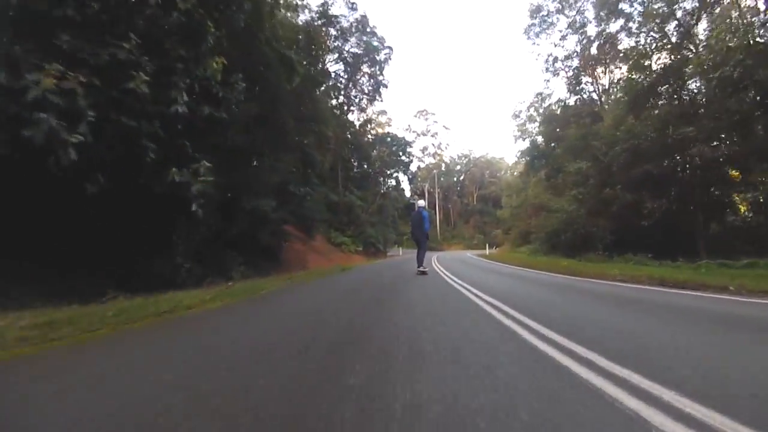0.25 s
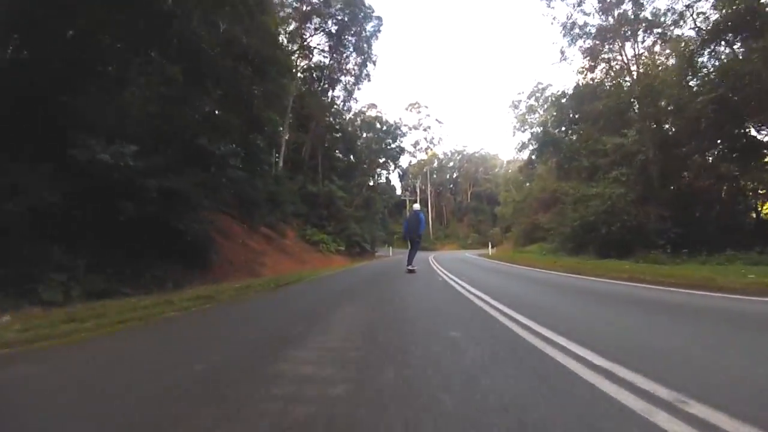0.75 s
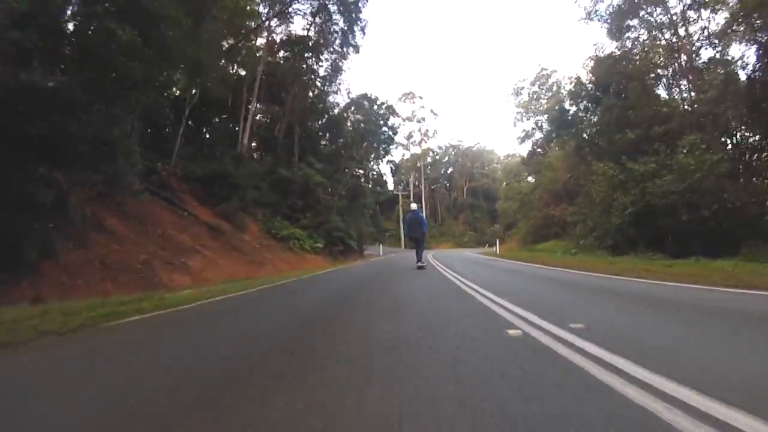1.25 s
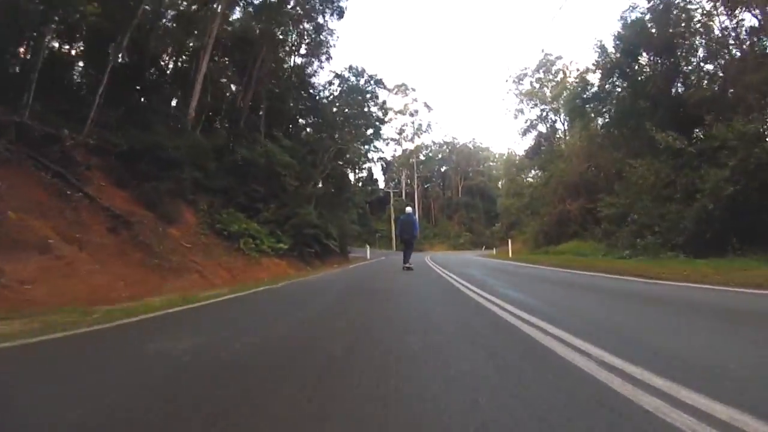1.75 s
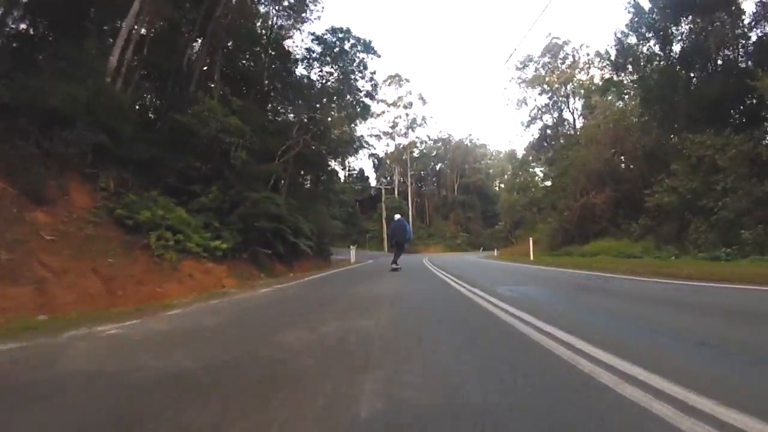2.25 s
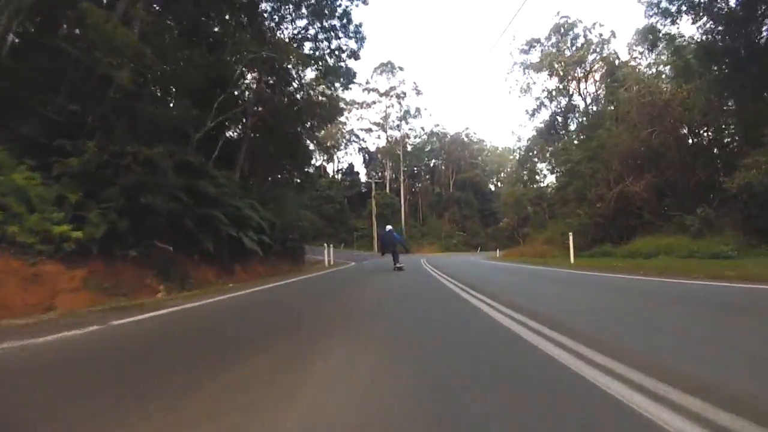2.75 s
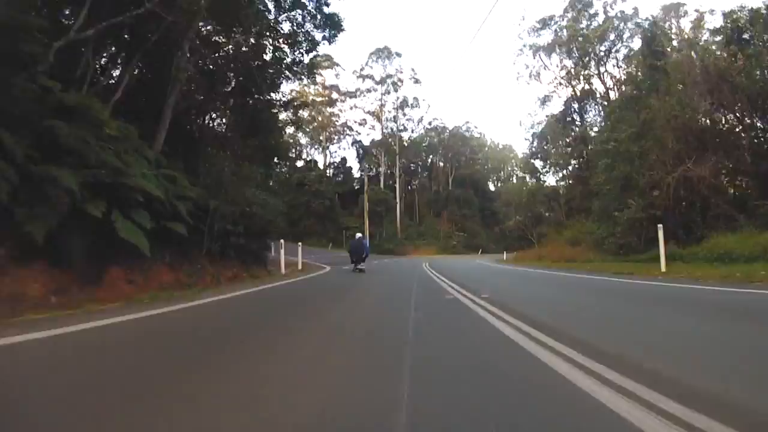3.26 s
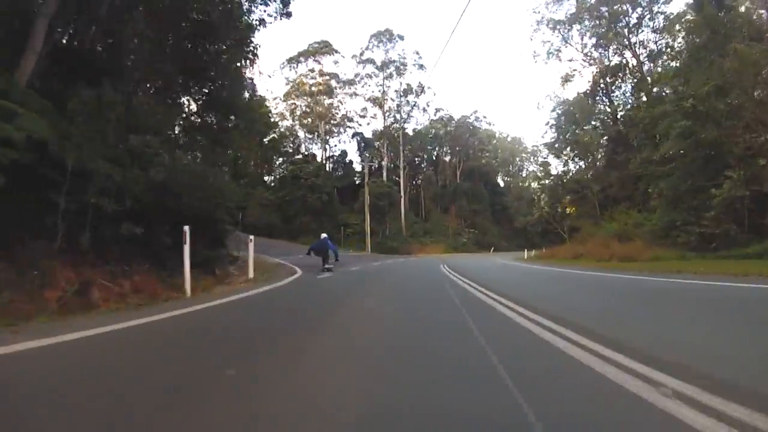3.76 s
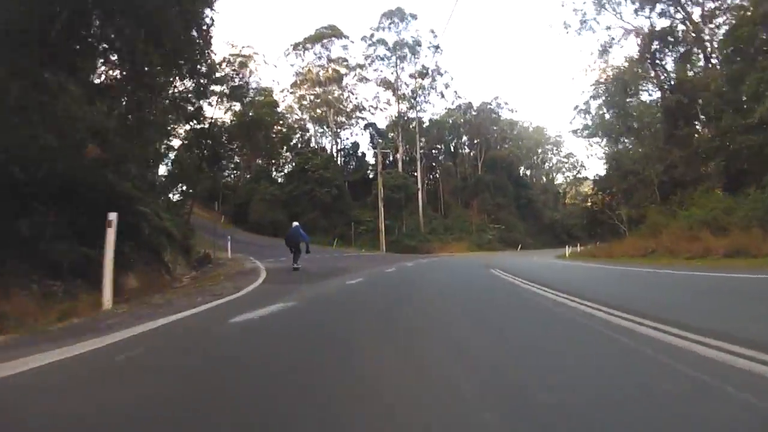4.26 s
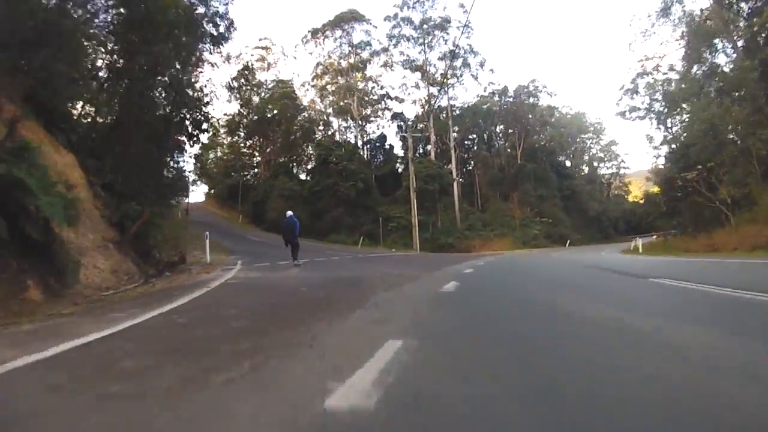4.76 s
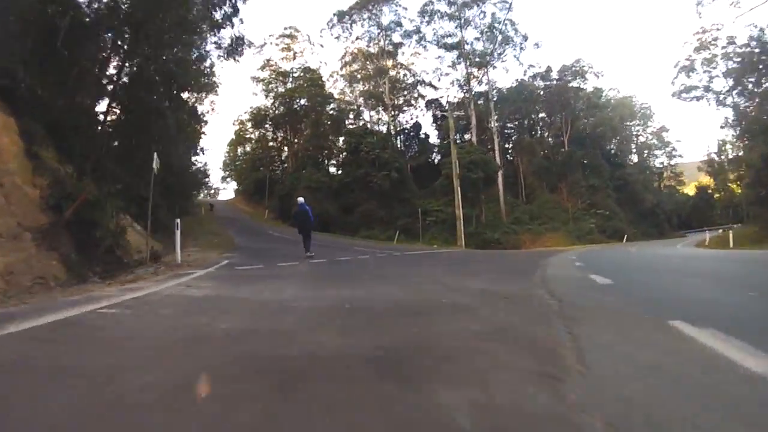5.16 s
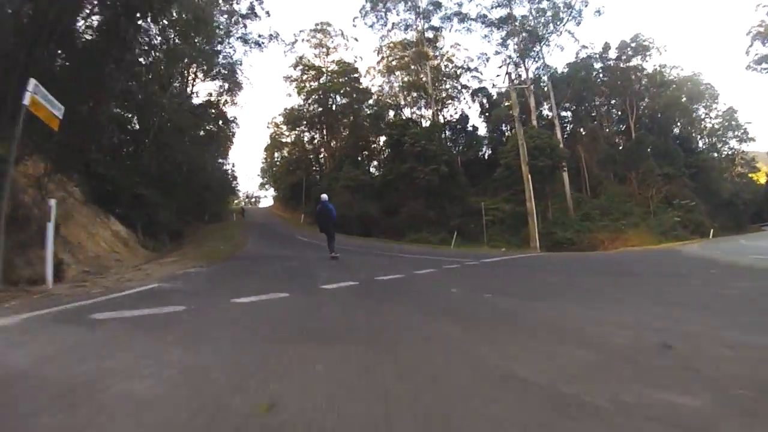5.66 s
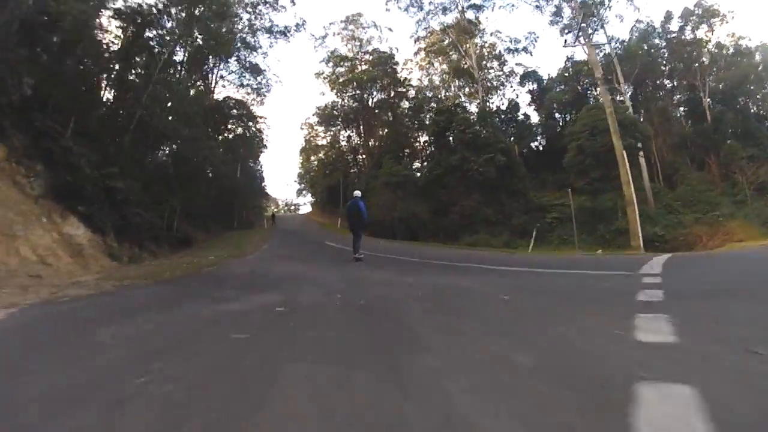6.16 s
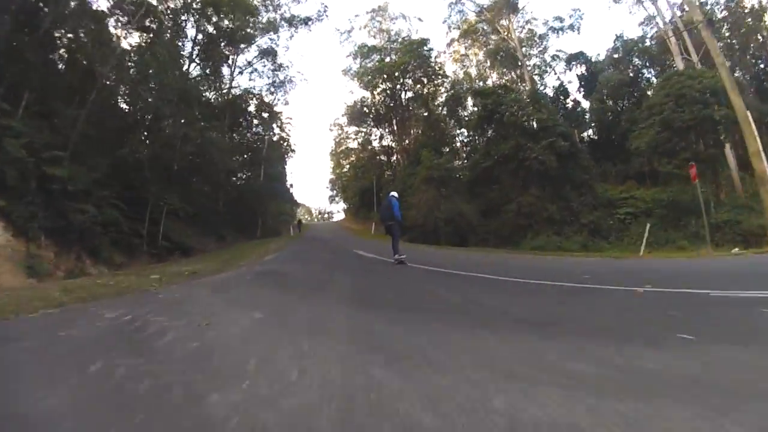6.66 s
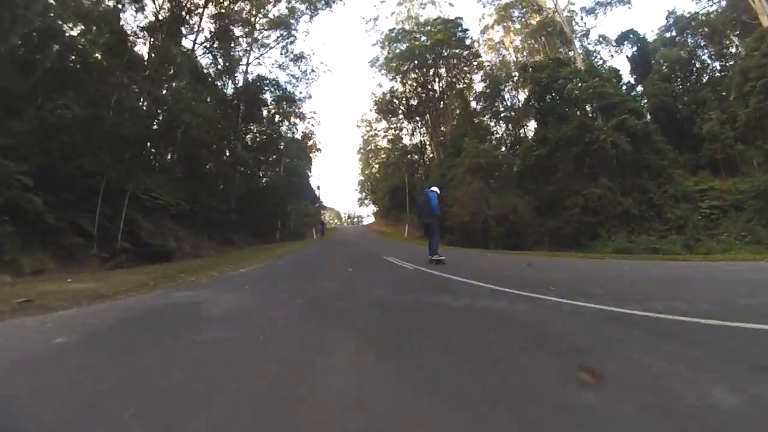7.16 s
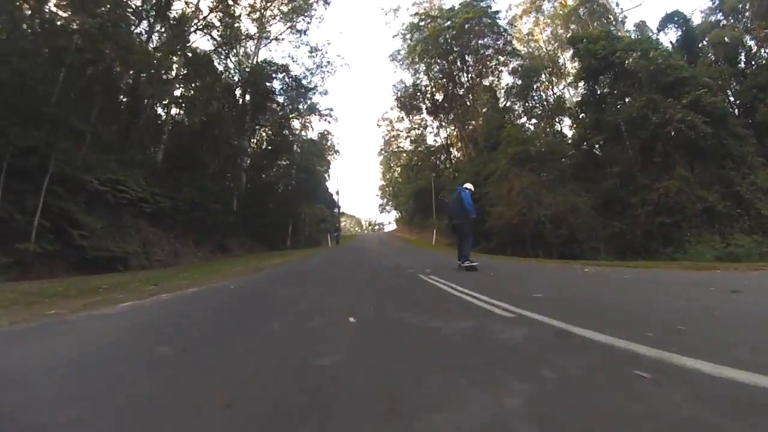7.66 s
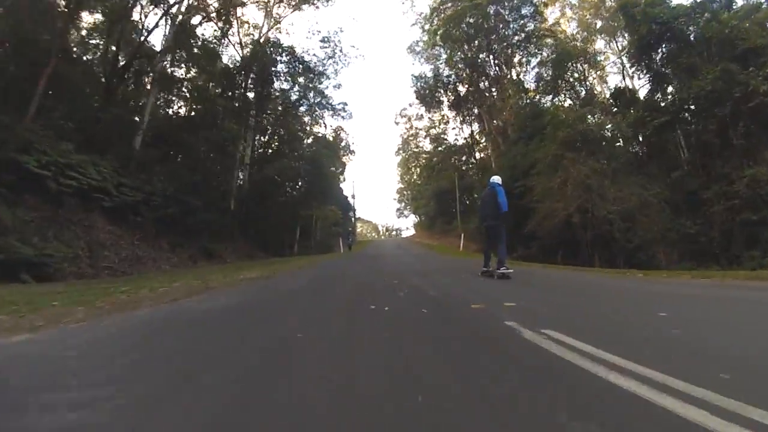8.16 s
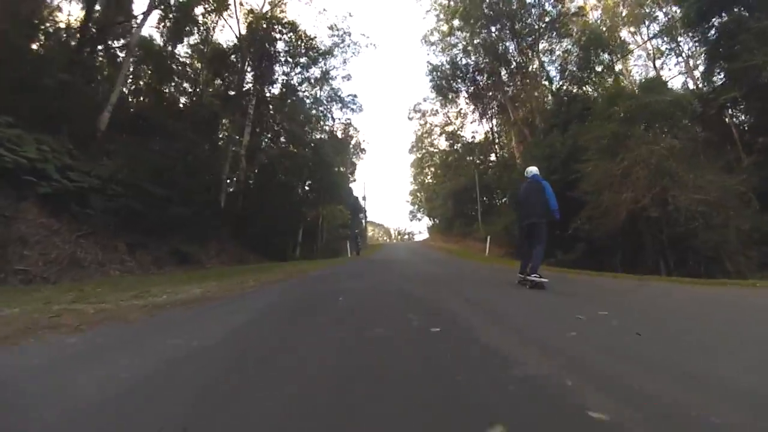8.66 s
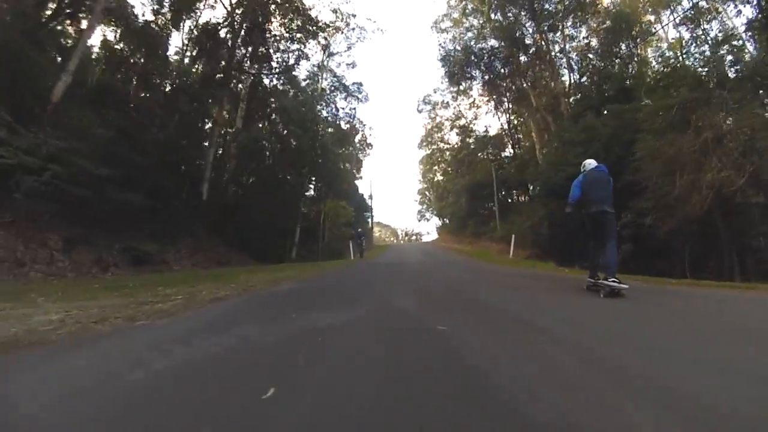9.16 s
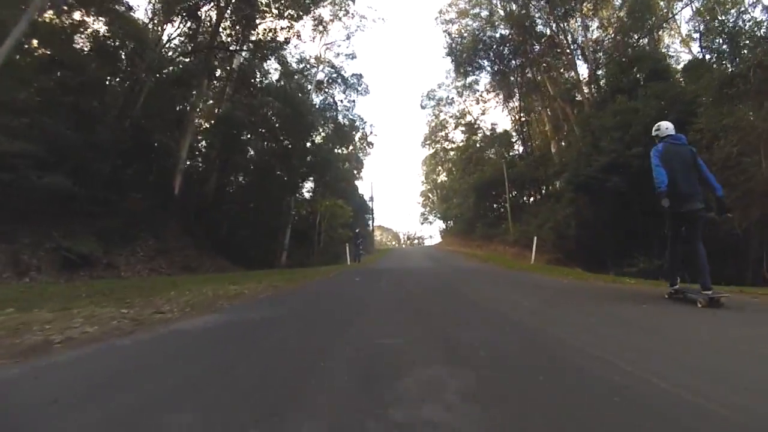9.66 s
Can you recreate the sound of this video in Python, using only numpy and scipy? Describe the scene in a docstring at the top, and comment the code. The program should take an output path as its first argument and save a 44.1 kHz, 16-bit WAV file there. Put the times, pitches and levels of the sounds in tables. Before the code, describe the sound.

From the start a fast ride on asphalt shakes the camera mount: a dominant, uneven bass rumble around 40 to 130 hertz, muffled wheel roar, fine gritty grinding and faint steady hiss. Small stones tick and crunch. Around 1.95-2.05 s a hard bump thuds with clustered stone knocks and bright case clacks; gravel and swelling rumble continue to 3.3 s, then it eases. A jolt at 3.9 s leads to the hardest hit at 4.15-4.3 s, with clacks and a ringing bracket rattle. From 4.7 to 6.3 s a thin wheel drone joins coarser grinding, with bumps near 5.1, 5.3 and 5.75 s and a rough patch at 6.5 s. After 7 s it slows and quietens; a low engine-like throb glides up and down, with tiny metallic chirps at 8.2-8.7 s. From 9.2 s a longboard's wheels rasp and sizzle close, still present at the end.

```python
"""A vehicle rolls fast down an asphalt road, its shaking carried into a low camera's mount and case.
Noise driven through resonant bodies makes the mount rock, the bodywork drum, the wheels roar and the grit grind.
Rough patches, two of them severe, swell it; soft pushes jolt the vehicle, and short noise bursts crunch and clack.
On the rise an engine-like throb of gliding partials dips and climbs as the camera draws up to a longboard rider,
whose wheels rasp and sizzle nearer in shaped noise; small metal parts ring as dying sines over a faint hiss."""
import sys
import numpy as np
from scipy import signal
from scipy.fft import rfft, irfft
from scipy.io import wavfile
from scipy.ndimage import uniform_filter1d

SR = 44100
rng = np.random.default_rng(int(sys.argv[2]) if len(sys.argv) > 2 else 0)


def unload_audio(sound):
    """Save the sound as a 16-bit wav file, at the path given as the first command line argument."""
    columns = np.transpose(np.atleast_2d(sound))
    # keep every value between -1 and 1, then stretch to whole-number steps
    steps = np.round(np.clip(columns, -1, 1) * 32767)
    wavfile.write(sys.argv[1], SR, steps.astype(np.int16))


N = 437017
TIME = np.arange(N) / SR
CUTOFF_HZ = 13500

# Speed falls in the curve and on the rise, then picks up again at the end: t/s, speed/share of top speed
SPEED_CURVE = [(0, 0.98), (2.9, 0.92), (4.9, 0.86), (6.5, 0.8), (7.25, 0.58), (8.9, 0.45), (9.9, 0.64)]
# Unevenness of the road under the wheels: t/s, relative level/dB
ROAD_UNEVENNESS = [(0, -0.5), (1.3, -0.4), (2.45, 1.5), (2.68, -0.5), (2.98, 2.5), (3.28, -1), (3.52, -5),
                   (4.05, -3.5), (4.6, -3.5), (4.95, -3.5), (5.35, 2.5), (5.92, -1), (7.15, -0.1), (7.5, 1),
                   (7.9, -2), (8.6, -0.5), (8.9, -3.5), (9.6, -2)]
# Rough patches under the wheels: t/s, length/s, relative shaking/dB, relative grinding/dB
ROUGH_PATCHES = [(0.293, .1, -17.5, -24), (1.634, 0.057, -5.5, -2), (1.948, 0.072, 0, 2.5),
                 (3.845, 0.03, -2.5, -1), (4.157, 0.074, 1, -1.5), (6.443, 0.29, -11.5, -10.5),
                 (6.8, 0.47, -15.5, -34), (9.233, 0.06, -13.5, -35)]
PATCH_ATTACK_S, SHAKE_FALL_DB_PER_S, GRIND_FALL_DB_PER_S = .02, 69, 71.5
# Long waves in the road that rock the mount: t/s, level/dB
ROAD_WAVES = [(1.24, -28), (1.55, -24), (2.0, -18.5), (2.55, -24.5), (2.8, -21.5), (2.95, -21),
              (3.268, -23), (3.92, -22.5), (4.191, -16), (5.43, -24.5), (5.759, -20.5), (6.55, -20.5)]
WAVE_S = 0.054  # from the crest of a wave to 1/e of it

# How the mount's sway answers the ride: level at top speed/dB, power of speed, power of the road's unevenness,
# level on a patch of 0 dB/dB
SWAY_RESPONSE = dict(cruise_db=-25, speed_power=2.21, road_share=0.73, patch_db=-24.5)
# The same settings for the drumming bodywork: level/dB, power, power, level/dB
BODYWORK_RESPONSE = dict(cruise_db=-33, speed_power=1.04, road_share=1.55, patch_db=-23)
# The same settings for the roaring wheels: level/dB, power, power, level/dB
ROAR_RESPONSE = dict(cruise_db=-55.5, speed_power=0.94, road_share=0.93, patch_db=-47.5)
# The same settings for air squeezed from under the wheels: level/dB, power, power, level/dB
AIR_RESPONSE = dict(cruise_db=-69.5, speed_power=2.9, road_share=0.98, patch_db=-68.5)
# The same settings for the grinding grit, before the side road: level/dB, power, power, level/dB
GRIND_RESPONSE = dict(cruise_db=-62, speed_power=1.47, road_share=0.28, patch_db=-57.5)
# The side road has coarser chips and grinds louder
SIDE_ROAD_S, SIDE_ROAD_BLEND_S, SIDE_ROAD_DB = 4, 1, 3

# Broad colour of the rocking mount: f/Hz, relative level per Hz/dB
SWAY_COLOUR = [(12, -48.5), (24, -27), (33, -4), (42, -7.5), (58, -7), (68, -20.5), (110, -39)]
# Slow sway resonance of the mount: f/Hz, width/Hz, height/dB
SWAY_RESONANCES = [(39.55, 5.3, 10)]
# Quicker nodding resonance of the mount: f/Hz, width/Hz, height/dB
NOD_RESONANCES = [(52.8, 7, 11.5)]
NOD_DB, NOD_POWER = -6.3, -0.9  # nod over sway at top speed, and its power of speed: more nod when slow
# Broad colour of the bodywork: f/Hz, relative level per Hz/dB
BODYWORK_COLOUR = [(45, -24.5), (72, 1), (98, -1.5), (112, -6), (128, -2.5), (162, -10), (176, -17),
                   (212, -16), (255, -28), (400, -45.5)]
# Bodywork resonances: f/Hz, width/Hz, height/dB
BODYWORK_RESONANCES = [(78.3, 9, 6), (98.6, 24, 2), (127.9, 4.2, 3.5), (171, 12, 4), (174, 6.1, -3),
                       (210, 84, 2.5)]
# Broad colour of the wheel roar: f/Hz, relative level per Hz/dB
ROAR_COLOUR = [(150, -11.5), (270, 0.5), (370, -1.5), (420, -8), (500, -8.5), (650, -16), (820, -17.5),
               (1050, -29.5), (1600, -36), (4000, -61.5)]
# Wheel resonance in the roar: f/Hz, width/Hz, height/dB
WHEEL_RESONANCES = [(450, 19, 2.1)]
# Colour of the squeezed air: f/Hz, relative level per Hz/dB
AIR_COLOUR = [(550, -14), (760, 0), (980, -2.5), (1250, -10.5)]
# Broad colour of grit heard through the case: f/Hz, relative level per Hz/dB
CASE_COLOUR = [(200, -21.5), (700, -11.5), (1020, -6.5), (1300, 0), (1700, 2), (2000, -1), (2520, -3),
               (2750, -13.5), (3200, -19.5), (3600, -12.5), (4300, -22), (5700, -27), (8000, -34),
               (13000, -40)]
# Case resonances: f/Hz, width/Hz, height/dB
CASE_RESONANCES = [(1236, 39, 4.5), (1462, 71, 7.1), (1532, 110, 5), (2120, 130, 2.3), (3970, 200, 2.4),
                   (4270, 160, 5.4), (4750, 110, 5.5), (5140, 170, 8.3)]

# Colour of the steady hiss: f/Hz, relative level per Hz/dB
FAINT_HISS_COLOUR = [(100, -3.5), (2500, 3.5), (4500, -1), (6000, -6), (7500, -6), (10500, -10.5),
                     (13000, -17.5)]
# Thin whine in the steady hiss: f/Hz, width/Hz, height/dB
WHINE_RESONANCES = [(7408, 14, 14)]
# The wheels drone, loudest in the curve and for a moment after the rise: t/s, level/dB
DRONE_CURVE = [(0, -79.5), (4.3, -74), (4.7, -62), (6.1, -60.5), (6.5, -68.5), (9.0, -81.5), (9.25, -59),
               (9.45, -83)]
DRONE_HZ, DRONE_POWER = 375.7, 0.33  # pitch at top speed, and its power of speed
# Small metal parts: f/Hz, relative peak level/dB, t60/s, power of speed
METAL_PARTS = [(2140, -55.5, .05, 4), (2480, -62, .03, 2), (4310, -69.5, .022, 1)]

# Stretches of gravel under the wheels: start t/s, end t/s, stones/s, strongest relative level/dB
GRAVEL_STRETCHES = [(0.1, 1.9, 20, -47.5), (2.281, 3.26, 34, -46.5), (4.225, 4.343, 80, -44.5),
                    (5.282, 5.497, 40, -46), (8.1, 8.66, 40, -53)]
GRAVEL_SPREAD_DB, GRAVEL_T60_S = 6, 0.025  # how much the stones differ; decay of each crunch
# A wheel strikes a stone or an edge: t/s, relative level/dB, t60 of the crunch/s
STONE_STRIKES = [(0.2855, -48, 0.023), (1.485, -45, 0.035), (1.9495, -36, 0.043), (1.9605, -37, .05),
                 (1.9935, -41.5, 0.092), (2.0275, -39.5, 0.058), (2.4384, -42.5, 0.024),
                 (2.6975, -46, 0.034), (4.1478, -41.5, .1), (4.1555, -43, 0.071), (4.1797, -33.5, 0.029),
                 (4.2168, -37.5, 0.048), (4.2551, -41.5, 0.048), (4.2665, -48.5, 0.041),
                 (4.3615, -44, 0.018), (5.2425, -40.5, 0.043), (5.7384, -45, .03), (6.4388, -42.5, 0.032),
                 (7.6785, -44, 0.014), (8.2444, -49, 0.03), (8.5805, -50.5, 0.04), (8.6598, -52, .03),
                 (9.0569, -42.5, .024), (9.098, -54.5, 0.044)]
# The vehicle's broad answer to a stone: f/Hz, relative level per Hz/dB
KNOCK_COLOUR = [(150, -1.5), (400, -4), (900, -5), (1300, 3), (2000, 0), (2500, 3.5), (2800, -8.5),
                (3150, -11.5), (3900, -11.5), (5500, -26), (9000, -33)]
# Resonances in that answer: f/Hz, width/Hz, height/dB
KNOCK_RESONANCES = [(1540, 82, 6), (2240, 50, 6), (2420, 180, 2)]
# The case clacks against its mount: t/s, relative level/dB
CASE_CLACKS = [(1.9784, -49), (1.987, -47.5), (1.9976, -54), (2.012, -47), (3.8636, -50), (4.147, -51),
               (4.163, -56), (4.1796, -40.5), (4.215, -53.5), (4.2345, -55.5), (5.1253, -55),
               (5.3288, -53.5), (6.5277, -53), (6.554, -57), (6.74, -55), (7.6784, -60), (9.0568, -60),
               (9.098, -57)]
CLACK_T60_S = 0.012
# Broad colour of a clack: f/Hz, relative level per Hz/dB
CLACK_COLOUR = [(400, -22.5), (1500, 4), (2500, 5.5), (3200, -8), (3900, 0), (4450, -13), (5200, -1),
                (6000, -5.5), (8000, -9.5), (10000, -13), (12500, -10.5), (14500, -40)]
# Resonances in a clack: f/Hz, width/Hz, height/dB
CLACK_RESONANCES = [(3850, 300, 2.7), (4890, 250, 11), (7500, 500, 5.4), (10800, 400, 6.6)]
# Bumps that jolt the whole vehicle; the strongest sets the overall peak: t/s, push level/dB
VEHICLE_JOLTS = [(1.975, -14), (1.993, -21.5), (3.893, -24), (4.15, -20), (4.176, -11.5), (4.22, -20.5),
                 (5.127, -24), (5.331, -27.5), (6.527, -32)]
# A bracket rattles around the hardest jolt: t/s, level before the mode's own/dB
BRACKET_RATTLES = [(4.1545, -53), (4.2236, -48), (4.2555, -50), (4.2665, -43.5), (4.297, -52), (4.325, -57)]
# What the bracket rings with: f/Hz, relative level/dB, t60/s
BRACKET_RINGS = [(2170, -11, .05), (2170, -8, 0.092)]

# The low throb on the rise: t/s, pitch f/Hz, relative level/dB, strain/0-1
THROB_CURVE = [(7.1, 42, -58, 0), (7.49, 46, -38.5, 0), (8.07, 50.27, -39.5, 0), (8.27, 49.95, -43.5, .6),
               (8.45, 40, -44, 0.05), (8.65, 48.85, -34, 0), (8.9, 56.18, -39.5, 0),
               (9.06, 50.8, -43, 0.56), (9.3, 54.94, -40, 0.96), (9.36, 39.2, -31, 0),
               (9.45, 44.17, -31.5, 0.22), (9.66, 53, -35, 0.4), (9.81, 59.9, -31.5, 0),
               (9.9, 63.36, -26.5, 0)]
# Partials of the throb: multiple of the pitch
THROB_MULTIPLES = [1, 1.5, 2, 3, 4, 6]
# Levels of those partials: level running easy/dB, level under strain/dB
THROB_PARTIALS = [(1, 3), (-20, 1.5), (-13.5, 2), (-27, -1.5), (-32, -8), (-44, -20.5)]
# A small metal part chirps on the rise: t/s, f/Hz
METAL_CHIRPS = [(8.162, 4245), (8.314, 4350), (8.355, 4270), (8.436, 4720), (8.456, 4730), (8.478, 4783),
                (8.556, 4310), (8.578, 4220), (8.659, 4330)]
CHIRP_DB, CHIRP_T60_S = -68.5, 0.032  # middle level and decay
CHIRP_LOW_HZ, CHIRP_LOW_DB = 3550, -5  # a lower mode, on average weaker, rings with it
# The longboard coming near: t/s, relative rasp level/dB
LONGBOARD_APPROACH = [(0, -100), (8.6, -84), (9.15, -71), (9.33, -64), (9.44, -58.5), (9.54, -54.3),
                      (9.67, -57.3), (9.78, -55.6), (9.9, -55.6)]
# Colour of the longboard's rasp: f/Hz, relative level per Hz/dB
RASP_COLOUR = [(350, 0), (500, -1), (950, -13), (1250, -6), (1480, 0), (2000, -1), (2550, -4), (3100, -22)]
# Resonances in the rasp: f/Hz, width/Hz, height/dB
RASP_RESONANCES = [(480, 38, 12), (1520, 120, 0.5), (2060, 53, 9), (2200, 150, 7), (2520, 80, 5)]
SIZZLE_FROM_S, SIZZLE_SWELL_S, SIZZLE_DB = 8.95, .85, -71.6  # an even swell up to this level
# Colour of the longboard's fine sizzle: f/Hz, relative level per Hz/dB
SIZZLE_COLOUR = [(3150, -10), (3500, 0), (4300, -1), (5800, -9.5), (7450, -8), (8200, -16), (13000, -24)]
# Resonance in the sizzle: f/Hz, width/Hz, height/dB
SIZZLE_RESONANCES = [(5130, 200, 3)]


def from_db(db):
    """Decibels to gain."""
    return 10 ** (np.asarray(db) / 20)


def rms_one(x):
    """Scale to unit power."""
    return x / np.sqrt(np.mean(x ** 2) + 1e-20)


def level_curve(rows):
    """Turn rows of time and dB into a gain per sample."""
    s, db = np.transpose(rows)
    return from_db(np.interp(TIME, s, db))


def drift(rate):
    """Slow chance of spread 1, changing about rate times a second."""
    knots = rng.standard_normal(int(TIME[-1] * rate) + 2)
    return rms_one(np.interp(TIME * rate, np.arange(len(knots)), knots))


def body(force, colour, modes, size=32768):
    """Ring a force through a causal response of unit energy: a broad colour with resonances on it."""
    hz = np.arange(size // 2 + 1) * SR / size
    points = np.array(colour)
    db = np.interp(np.log(hz + 1), np.log(points[:, 0]), points[:, 1])
    # fall away beyond both ends of the colour
    above = np.maximum(hz / points[-1, 0], 1)
    below = np.maximum(points[0, 0] / (hz + 1), 1)
    db -= 40 * np.log10(above * below)
    for centre, width, height in modes:
        db += height / (1 + (2 * (hz - centre) / width) ** 2)
    # minimum phase: nothing sounds early
    cepstrum = irfft(np.log(from_db(db)))[:size // 2]
    response = irfft(np.exp(rfft(2 * cepstrum, size)))[:size // 2]
    return signal.fftconvolve(force, response / np.linalg.norm(response))[:N]


def steadied(x, seconds):
    """Even out the swells of a vibration that last longer than the given time."""
    window = int(seconds * SR)
    power = uniform_filter1d(uniform_filter1d(x ** 2, window), window)
    return x / np.sqrt(np.abs(power) + 1e-12)


def wandering(x, share, per_s):
    """Let the pitch of a vibration stray a little as the load shifts."""
    position = np.cumsum(1 + share * drift(per_s))
    return np.interp(position * (N - 1) / position[-1], np.arange(N), x)


def contacts(events, crunch, rise_s):
    """Each contact is a sharp click and a short noise crunch that builds up quickly and dies."""
    force, age = np.zeros(N), TIME[:SR // 10]
    for s, db, t60 in events:
        swell = np.minimum(age / rise_s, 1) * from_db(-60 * np.maximum(age - rise_s, 0) / t60)
        blow = crunch * rng.standard_normal(len(age)) * swell
        blow[0] += 1
        at = int(s * SR)
        force[at:at + len(age)] += from_db(db) * blow[:N - at]
    return force


def speed():
    """Share of top speed at every sample."""
    return np.maximum(np.interp(TIME, *np.transpose(SPEED_CURVE)), .1)


def patches():
    """Rough patches set in quickly, hold and die away: gains of shaking and of grinding."""
    shake, grind = np.zeros(N), np.zeros(N)
    for s, length, shake_db, grind_db in ROUGH_PATCHES:
        entered = np.clip(1 + (TIME - s) / PATCH_ATTACK_S, 0, 1)
        since = np.maximum(TIME - s - length, 0)
        shake += entered * from_db(shake_db - SHAKE_FALL_DB_PER_S * since)
        grind += entered * from_db(grind_db - GRIND_FALL_DB_PER_S * since)
    return shake, grind


def driven(patch, cruise_db, speed_power, road_share, patch_db):
    """A part's gain grows with speed and unevenness; rough patches add their power on top."""
    ride = from_db(cruise_db) * speed() ** speed_power * level_curve(ROAD_UNEVENNESS) ** road_share
    return np.hypot(ride, from_db(patch_db) * patch)


def sway_level(shake, wander_db):
    """How far the mount rocks: with the ride, wandering a little, and swelling on each wave in the road."""
    waves = sum(from_db(db) * np.exp(-((TIME - s) / WAVE_S) ** 2) for s, db in ROAD_WAVES)
    return np.hypot(driven(shake, **SWAY_RESPONSE) * from_db(wander_db * drift(5.5)), waves)


def rumble(shake):
    """The uneven road rocks the mount, drums on the bodywork, roars in the wheels and squeezes out air."""
    road = rng.standard_normal((5, N))
    lumps = from_db(1.7 * drift(70))  # the same lumps of asphalt push on mount and bodywork
    sway = body(road[0] * lumps, SWAY_COLOUR, SWAY_RESONANCES)
    nod = from_db(NOD_DB) * speed() ** NOD_POWER * body(road[1] * lumps, SWAY_COLOUR, NOD_RESONANCES)
    rocking = sway_level(shake, wander_db=0.95) * steadied(sway + nod, seconds=0.085)
    bodywork = wandering(body(road[2] * lumps, BODYWORK_COLOUR, BODYWORK_RESONANCES), share=.025, per_s=4)
    drumming = driven(shake, **BODYWORK_RESPONSE) * steadied(bodywork, seconds=0.064)
    roar_force = road[3] * from_db(1.5 * drift(60))
    roaring = driven(shake, **ROAR_RESPONSE) * body(roar_force, ROAR_COLOUR, WHEEL_RESONANCES)
    squeezed_air = driven(shake, **AIR_RESPONSE) * body(road[4], AIR_COLOUR, [])
    return rocking + drumming + roaring + squeezed_air


def grit_level(grind):
    """How hard the chips tap the wheels; harder once the vehicle is on the side road."""
    side_road = np.clip((TIME - SIDE_ROAD_S) / SIDE_ROAD_BLEND_S, 0, 1)
    return driven(grind, **GRIND_RESPONSE) * from_db(SIDE_ROAD_DB * side_road)


def grinding(grit, grains_per_s, spread_db, smooth_share, patchy_db, clump_db):
    """Countless chips of the asphalt tap the wheels, in clumps, and ring in the case."""
    sizes = from_db(spread_db * np.minimum(rng.exponential(1, N), 5)) * rng.choice([-1, 1], N)
    grains = rms_one(sizes * (rng.random(N) < grains_per_s / SR))
    texture = grains + smooth_share * rng.standard_normal(N)
    clumps = from_db(patchy_db * drift(110) + clump_db * drift(22))
    return body(grit * rms_one(texture * clumps), CASE_COLOUR, CASE_RESONANCES)


def faint_hiss():
    """Steady noise with a narrow resonance gives a hiss with a thin whine under everything."""
    return from_db(-77.5) * body(rng.standard_normal(N), FAINT_HISS_COLOUR, WHINE_RESONANCES)


def drone(width_hz):
    """A narrow, wavering band of wheel vibration follows the speed in pitch."""
    phase = 2 * np.pi * np.cumsum(DRONE_HZ * speed() ** DRONE_POWER) / SR
    band = drift(width_hz) * np.cos(phase) + drift(width_hz) * np.sin(phase)
    return level_curve(DRONE_CURVE) * rms_one(band)


def pings(per_s, spread_db):
    """Now and then a chip sets one metal part ringing, harder at speed."""
    age, out = TIME[:SR // 10], np.zeros(N)
    for hz, db, t60, speed_power in METAL_PARTS:
        taps = (rng.random(N) < per_s / SR) * from_db(-spread_db * rng.random(N))
        ring = np.sin(2 * np.pi * hz * age) * from_db(db - 60 * age / t60)
        out += signal.fftconvolve(taps * speed() ** speed_power, ring)[:N]
    return out


def chatter(grit, per_s, over_db, spread_db, t60):
    """Lesser stones at random times follow the level of the grinding: rows of t/s, level/dB, t60/s."""
    draws = rng.random((int(per_s * TIME[-1]), 2))
    s = draws[:, 0] * TIME[-1]
    db = 20 * np.log10(np.interp(s, TIME, grit)) + over_db - spread_db * draws[:, 1]
    return np.column_stack([s, db, np.full(len(s), t60)])


def gravel():
    """Small stones follow each other closely and unevenly: rows of t/s, level/dB, t60/s."""
    stones = []
    for start, end, per_s, db in GRAVEL_STRETCHES:
        for when, weaker in rng.random((int(per_s * (end - start)), 2)):
            stones.append((start + when * (end - start), db - GRAVEL_SPREAD_DB * weaker, GRAVEL_T60_S))
    return stones


def knocks(grit):
    """Stones knock dully through the vehicle, small ones crunch softly, and the hard case clacks brightly."""
    strikes = from_db(3.5) * contacts(STONE_STRIKES, crunch=0.33, rise_s=0.0012)
    small_stones = [*chatter(grit, per_s=20, over_db=11.0, spread_db=3.5, t60=.02), *gravel()]
    strikes += contacts(small_stones, crunch=0.38, rise_s=0.002)
    clack_events = [(s, db, CLACK_T60_S) for s, db in CASE_CLACKS]
    clack_force = contacts(clack_events, crunch=0.32, rise_s=.0003)
    clacks = from_db(7.5) * body(clack_force, CLACK_COLOUR, CLACK_RESONANCES)
    return body(strikes, KNOCK_COLOUR, KNOCK_RESONANCES) + clacks


def jolts(push_s, sway_share):
    """A bump is a soft push through the wheels that sets bodywork and mount swinging."""
    force = np.zeros(N)
    for s, db in VEHICLE_JOLTS:
        force -= from_db(db) * np.exp(-((TIME - s) / push_s) ** 2)
    swing = body(force, BODYWORK_COLOUR, BODYWORK_RESONANCES)
    swing += sway_share * body(force, SWAY_COLOUR, SWAY_RESONANCES)
    return swing / np.abs(swing).max() * from_db(max(db for s, db in VEHICLE_JOLTS))


def bracket_ring():
    """A loose bracket rattles around the hardest jolt, and each knock leaves it ringing in dying sines."""
    out, age = np.zeros(N), TIME[:SR // 5]
    for s, db in BRACKET_RATTLES:
        at = int(s * SR)
        for hz, mode_db, t60 in BRACKET_RINGS:
            out[at:at + len(age)] += np.sin(2 * np.pi * hz * age) * from_db(db + mode_db - 60 * age / t60)
    return out


def throb(waver, flutter_db):
    """A low, engine-like throb glides with its pitch curve; under strain its overtones come up."""
    s, hz, db, strain = np.transpose(THROB_CURVE)
    pitch = np.interp(TIME, s, hz) * (1 + waver * drift(25))
    phase = 2 * np.pi * np.cumsum(pitch) / SR
    strain = np.clip(np.interp(TIME, s, strain), 0, 1)
    tone = np.zeros(N)
    for order, (easy_db, strained_db) in zip(THROB_MULTIPLES, THROB_PARTIALS):
        partial_db = easy_db + strain * (strained_db - easy_db) + flutter_db * drift(15)
        tone += from_db(partial_db) * np.sin(order * phase + 2 * np.pi * rng.random())
    return np.sqrt(2) * from_db(np.interp(TIME, s, db)) * (TIME > s[0]) * tone


def chirps(spread_db):
    """Each chirp is a brief ring of two modes, a little stronger or weaker every time."""
    out, age = np.zeros(N), TIME[:SR // 10]
    for s, hz in METAL_CHIRPS:
        high, low = from_db(CHIRP_DB + spread_db * rng.standard_normal(2))
        ring = high * np.sin(2 * np.pi * hz * age)
        ring += low * from_db(CHIRP_LOW_DB) * np.sin(2 * np.pi * CHIRP_LOW_HZ * age)
        at = int(s * SR)
        out[at:at + len(age)] += ring * from_db(-60 * age / CHIRP_T60_S)
    return out


def longboard():
    """The longboard's wheels come through the air as a surging rasp with a dense, even sizzle."""
    surging = rng.standard_normal(N) * from_db(1.9 * drift(200))
    rasp = level_curve(LONGBOARD_APPROACH) * from_db(-3.5) * body(surging, RASP_COLOUR, RASP_RESONANCES)
    near = np.clip((TIME - SIZZLE_FROM_S) / SIZZLE_SWELL_S, 0, 1)
    sizzle = near * from_db(SIZZLE_DB) * body(rng.standard_normal(N), SIZZLE_COLOUR, SIZZLE_RESONANCES)
    return rasp + sizzle


def scene():
    """Everything meets at the one microphone."""
    shake, grind = patches()
    grit = grit_level(grind)
    vehicle = rumble(shake) + drone(width_hz=36) + jolts(push_s=0.0013, sway_share=1.0) + knocks(grit)
    wheels = grinding(grit, grains_per_s=2500, spread_db=1.0, smooth_share=0.71, patchy_db=1.7, clump_db=.5)
    metal = from_db(5.5) * pings(per_s=7.9, spread_db=7.5) + chirps(spread_db=2.0) + bracket_ring()
    low_throb = throb(waver=0.01574, flutter_db=2.0)
    return (vehicle + wheels + metal + low_throb + longboard() + faint_hiss())[None]


def record(dry):
    """A steep low-pass cuts the top."""
    low_pass = signal.ellip(10, .1, 80, CUTOFF_HZ, fs=SR, output="sos")  # ripple, stop band in dB
    return signal.sosfilt(low_pass, dry)


dry = scene()
out = record(dry)
unload_audio(out)
```